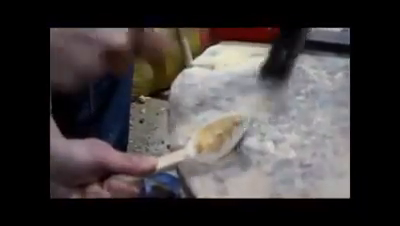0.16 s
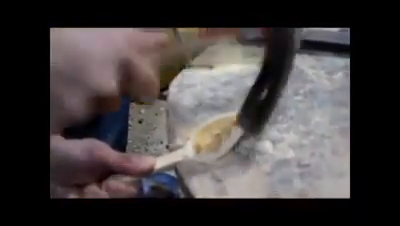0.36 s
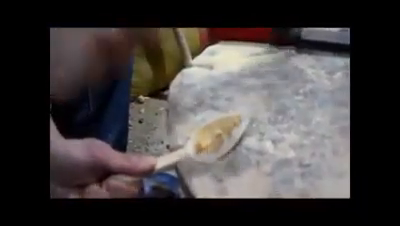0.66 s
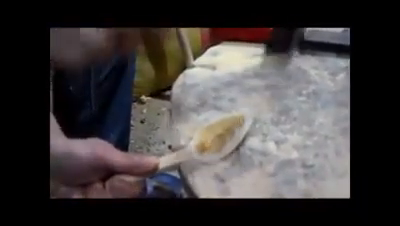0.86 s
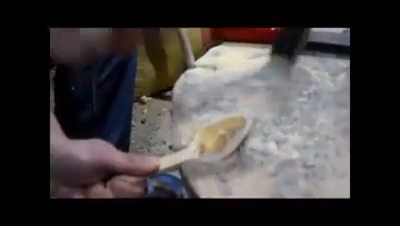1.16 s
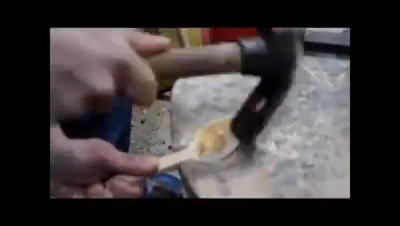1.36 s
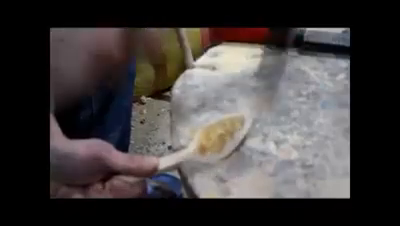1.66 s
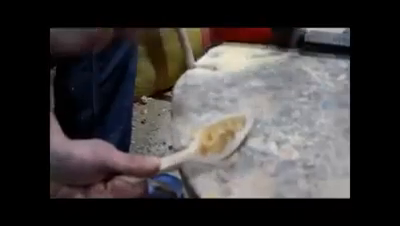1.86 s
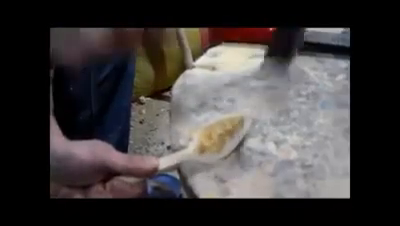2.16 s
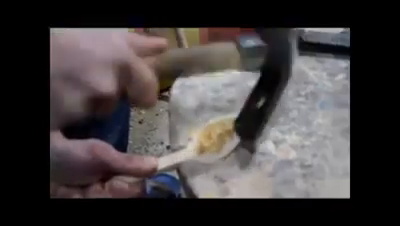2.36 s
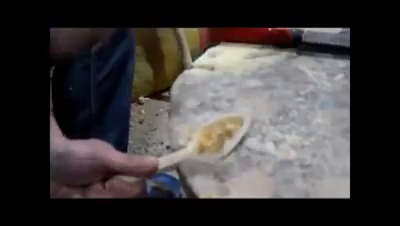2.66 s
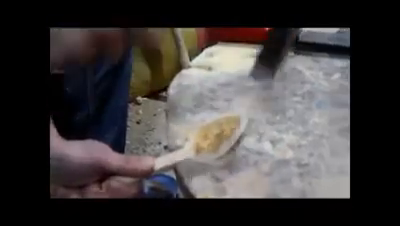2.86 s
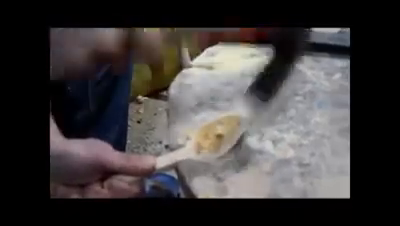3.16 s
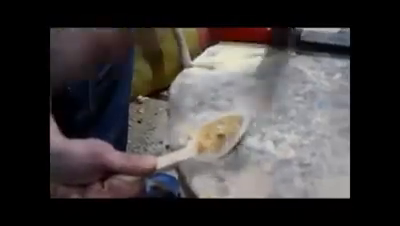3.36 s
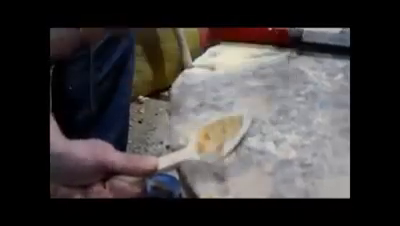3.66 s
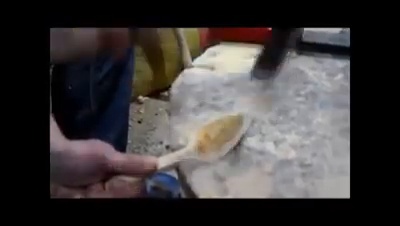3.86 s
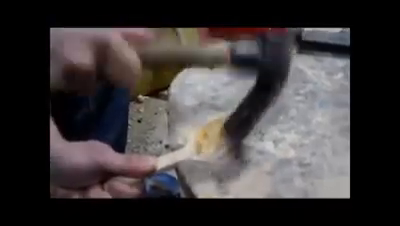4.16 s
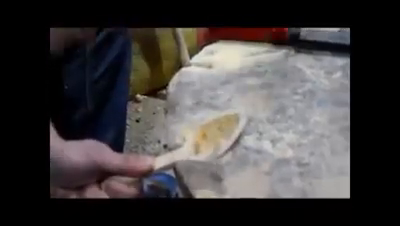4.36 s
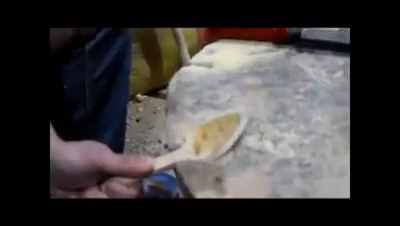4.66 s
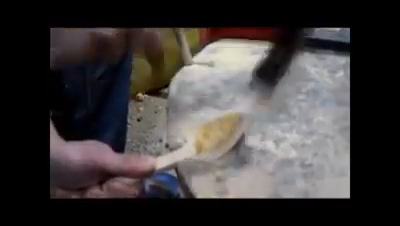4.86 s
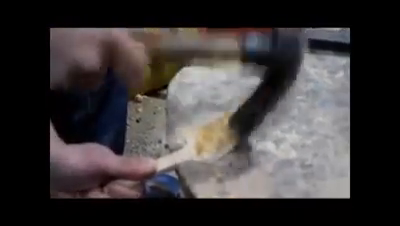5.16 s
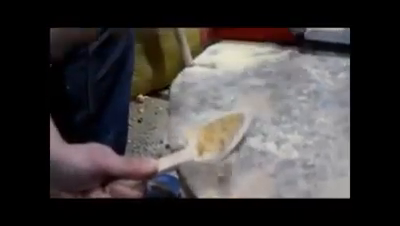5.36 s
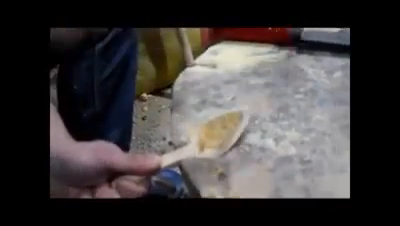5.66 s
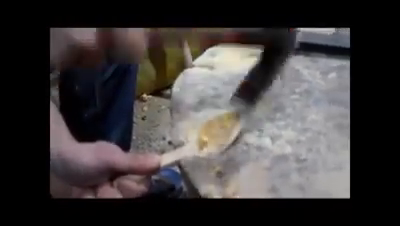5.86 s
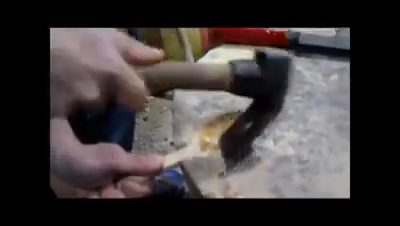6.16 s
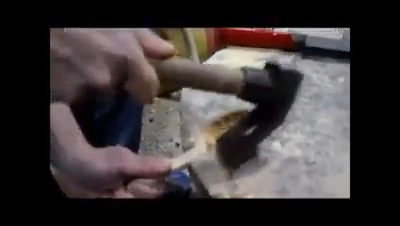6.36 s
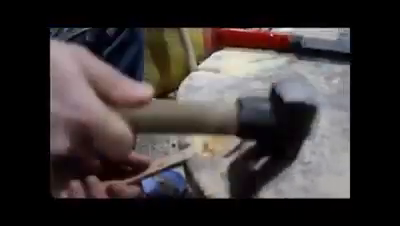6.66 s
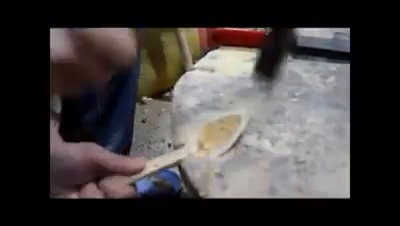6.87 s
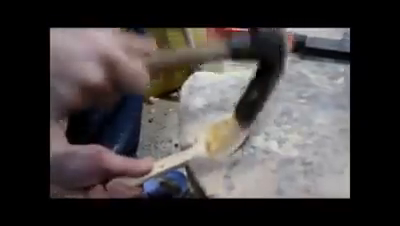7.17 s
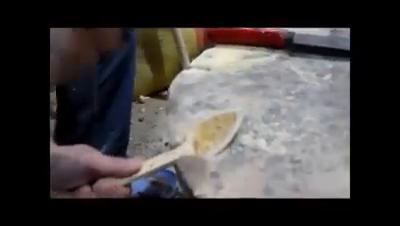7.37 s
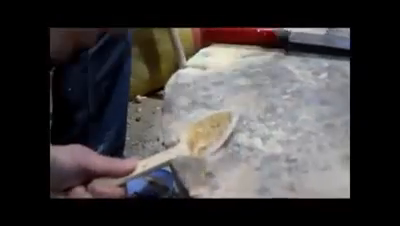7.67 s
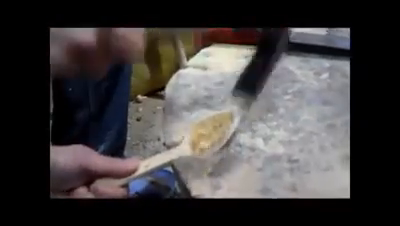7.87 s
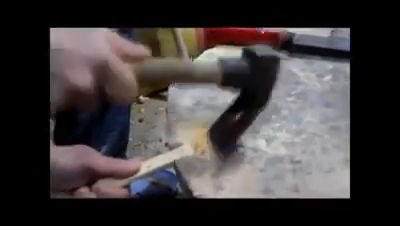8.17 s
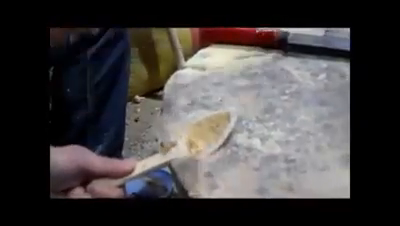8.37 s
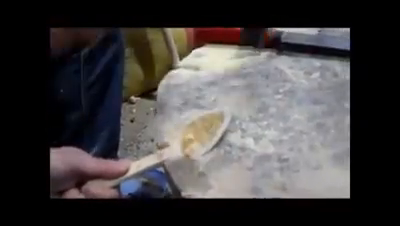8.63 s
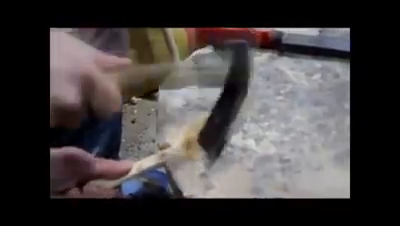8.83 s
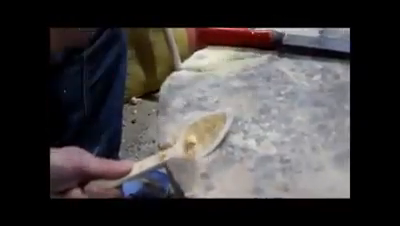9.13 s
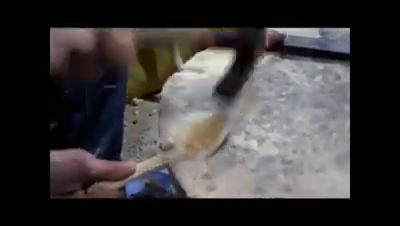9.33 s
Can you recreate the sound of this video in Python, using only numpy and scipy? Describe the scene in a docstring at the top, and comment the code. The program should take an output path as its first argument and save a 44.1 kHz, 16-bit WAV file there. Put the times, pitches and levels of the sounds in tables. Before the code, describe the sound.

Sharp, close wood chops with a dull knock underneath repeat evenly, stop briefly for two light knocks, then resume as small chips tick down.

```python
"""In a small workshop, a hand adze hollows a wooden spoon that lies on a heavy chopping block.
Each impact cracks the fibres in a burst of noise and excites the modes of spoon, steel and block;
the room reverberates and the close microphone overloads. Chips tick down and shavings rustle
over a steady background noise, and in a short pause the work is knocked lightly twice."""
import sys
import numpy as np
from scipy import signal
from scipy.fft import rfft, irfft
from scipy.io import wavfile

SR = 44100
rng = np.random.default_rng(int(sys.argv[2]) if len(sys.argv) > 2 else 0)


def pcm_store(signal):
    """Save signal as 16-bit PCM."""
    levels = np.round(np.clip(np.atleast_2d(signal), -1, 1) * 32767)
    wavfile.write(sys.argv[1], SR, levels.astype(np.int16).T)


N = 418950
AGE = np.arange(int(.8 * SR)) / SR   # seconds since an event began


def from_db(db):
    """Amplitude ratio of a level in decibels."""
    return 10 ** (np.asarray(db) / 20)


def unit_energy(x):
    """Energy normalisation: the squares sum to one."""
    return x / np.sqrt(np.sum(x ** 2) + 1e-20)


def at_hz(points, hz, column=1):
    """Interpolation of a table column along log frequency."""
    table = np.array(points)
    return np.interp(np.log(np.maximum(hz, 1)), np.log(table[:, 0]), table[:, column])


def nearness(hz, centre_hz, octaves):
    """Gaussian weighting in log frequency, one at the centre."""
    return np.exp(-(np.log2(hz / centre_hz) / octaves) ** 2)


def decay(t60_s):
    """Exponential damping: 60 dB down after t60_s."""
    return np.exp(-np.log(1000) * AGE / t60_s)


def onset(rise_s):
    """Finite rise time: a smooth climb from zero to one."""
    return 1 - np.exp(-(AGE / rise_s) ** 2)


def noise(spectrum):
    """Spectral shaping of white noise by rows of (frequency_hz, density_db); rms 1."""
    gain = from_db(at_hz(spectrum, np.arange(N // 2 + 1) * SR / N))
    return unit_energy(irfft(rfft(rng.standard_normal(N)) * gain, N)) * np.sqrt(N)


def resonance(x, hz, octaves):
    """A single resonator passes a band around its pitch."""
    edges = np.clip([hz / 2 ** (octaves / 2), hz * 2 ** (octaves / 2)], 10, .47 * SR)
    return signal.sosfilt(signal.butter(1, edges, "band", fs=SR, output="sos"), x + 1e-18)


def ring(modes, drive_db, scatter_db, detune):
    """Modal superposition: the point of contact varies each damped sine's sign, strength and pitch."""
    hz, level_db, t60_s = np.transpose(modes)
    polarity, strength, mistuning = rng.standard_normal((3, len(hz)))
    gains = np.sign(polarity) * from_db(level_db + drive_db + scatter_db * strength)
    pitches = hz * (1 + detune * mistuning)
    return sum(g * np.sin(2 * np.pi * f * AGE) * decay(t) for g, f, t in zip(gains, pitches, t60_s))


def add(track, start_s, sound):
    """Linear superposition of a sound from start_s on."""
    start = int(round(start_s * SR))
    part = sound[max(-start, 0):N - start]
    track[max(start, 0):max(start, 0) + len(part)] += part


def background():
    """Stationary noise of the workshop, strongest in the low hundreds of hertz."""
    # noise spectrum: frequency_hz, density_db
    spectrum = [(18, -59), (30, -22.5), (161, -4), (204, -9), (233, -4.5), (303, -8.5), (355, -4),
                (394, -11), (486, -6.5), (540, -10.5), (988, -13), (1250, -14.5), (4300, -26.5),
                (16000, -51.5)]
    return from_db(-43.5) * noise(spectrum)


def tick(hz, t60_s):
    """Impact on a sliver of wood: a damped noise burst through one resonance; peak 1."""
    size = SR // 10
    burst = rng.standard_normal(size) * (decay(t60_s) * onset(0.00061))[:size]
    click = resonance(burst, hz, octaves=0.47)
    return np.pad(click / np.max(np.abs(click)), (0, len(AGE) - size))


def tearing(cut_s, treble_db, top_db):
    """Fracture noise: fibres part within milliseconds, brighter when the wood splits cleanly."""
    # spectrum of splitting fibres: frequency_hz, density_db
    colour = [(200, -11.5), (800, -2.5), (1200, -6.5), (1700, 3), (3000, 1), (5000, -7), (7500, -14),
              (9000, -20.5), (16000, -27)]
    size = 2048
    cut = np.exp(-(AGE / cut_s) ** 2)
    rough_tail = from_db(-21.0) * decay(0.046)
    envelope = (onset(0.00022) * (cut + rough_tail))[:size]
    raw = rfft(rng.standard_normal(size) * envelope)
    # so many fibres break that no single pitch stands out
    burst = irfft(raw / (np.abs(raw) + 1e-12)) * np.sqrt(envelope)
    hz = np.arange(len(AGE) // 2 + 1) * SR / len(AGE)
    spectrum = rfft(burst, len(AGE)) * from_db(at_hz(colour, hz))
    strength = np.linalg.norm(irfft(spectrum))
    brightness_db = at_hz([(2800, 0.0055), (4800, treble_db), (7500, treble_db), (9500, top_db)], hz)
    crack = irfft(spectrum * from_db(brightness_db)) / strength
    crack[size:] = 0
    return crack


def spoon(spot_hz):
    """Selective excitation: the spoon's modes ring most strongly near the struck spot's pitch."""
    # spoon under the blade: pitch_hz, level_db, t60_s
    modes = [(734, -12.5, 0.0098), (924, -3.5, 0.0068), (1528, -15, 0.02), (1633, -7.5, 0.0077),
             (2016, -6, 0.0091), (2259, -11, 0.014), (2837, -6, 0.0076), (3813, 8.5, 0.0027),
             (4090, 12.5, 0.0016)]
    drive_db = 12.5 * nearness(np.array(modes)[:, 0], spot_hz, octaves=0.12)
    return unit_energy(ring(modes, drive_db, scatter_db=2.5, detune=0.012) * onset(0.00067))


def shove():
    """Heavily damped resonance: the dull push of the adze head against the block."""
    pulse = decay(0.0051) * onset(0.00027)
    return unit_energy(resonance(pulse, hz=388, octaves=1.1))


def steel(spot_hz):
    """Free vibration of the adze head: faint, but stronger when one particular spot is struck."""
    # steel head: pitch_hz, level_db, t60_s
    modes = [(7000, -39, 0.16), (7260, -31.5, 0.11)]
    drive_db = -8.5 + 14.5 * nearness(spot_hz, centre_hz=1643, octaves=.08)
    return ring(modes, drive_db, scatter_db=2.0, detune=0.0017)


def block(push_db, hollow_db):
    """Transmission through the spoon into the block: low modes thud, higher ones knock, a few ring hollow."""
    # chopping block and its stand: pitch_hz, level_db, t60_s
    modes = [(87, -38.5, 0.34), (126, -37.5, 0.57), (148.8, -32, 0.53), (163.6, -24.5, 0.22),
             (183, -37, 0.2), (222, -26, 0.098), (229.4, -23.5, 0.15), (277, -36.5, 0.61),
             (309.7, -29, 0.25), (339, -32, 0.48), (411.6, -29, 0.42), (442, -30, 0.47),
             (471.4, -27.5, 0.3), (524, -22, 0.14), (569, -37.5, 0.6), (584, -30, 0.31), (681, -16.5, 0.1),
             (700, -29, 0.3), (814, -45, 0.45), (843, -30.5, 0.2), (990, -46, 0.39), (1057, -37.5, 0.39)]
    hz = np.array(modes)[:, 0]
    # the knock grows faster with the push than the thud does
    drive_db = at_hz([(280, 0.96 * push_db), (560, 1.01 * push_db)], hz)
    drive_db += nearness(hz, centre_hz=464, octaves=0.25) * (hollow_db - drive_db)
    return ring(modes, drive_db, scatter_db=2.0, detune=0.003) * onset(0.0036)


def workshop():
    """Room impulse response: early reflections and a diffuse tail that dies sooner in the treble."""
    # reverberation: frequency_hz, density_db, t60_s
    reverb = [(50, -5, 1), (141, 4.5, 0.37), (394, 5, 0.43), (745, -1, 0.42), (1330, -4, 0.52),
              (1940, -6.5, 0.44), (3270, -13, 0.44), (6700, -9.5, 0.43), (8900, -7, 0.21),
              (16000, -16.5, 0.3)]
    # first returns from floor, bench and walls: delay_s, level_db
    reflections = [(.0105, -24), (.0148, -28), (.0178, -21), (.047, -25.5)]
    edges = np.geomspace(35, 17000, 19)
    white = rng.standard_normal((2, len(AGE)))
    far_wall_swell = 1 + from_db(-16.0) * np.exp(-((AGE - 0.031) / 0.032) ** 2)
    response = np.zeros(len(AGE))
    for k, (low, high) in enumerate(zip(edges, edges[1:])):
        hz = np.sqrt(low * high)
        band = signal.sosfilt(signal.butter(2, [low, high], "band", fs=SR, output="sos"), white[k % 2])
        envelope = decay(at_hz(reverb, hz, column=2)) * onset(0.002) * far_wall_swell
        gain = from_db(at_hz(reverb, hz)) * np.sqrt((high - low) * 2 / SR)
        response += gain * unit_energy(band * envelope)
    for delay_s, level_db in reflections:
        add(response, delay_s, from_db(level_db) * np.array([1, 2, 1]) / 4)
    return response


def adze(room):
    """Impulsive excitation: each blow drives fibres, spoon, steel and block at once."""
    # blows, about three a second: start_s, force_db, spot_hz, treble_db, push_db, hollow_db
    blows = [(-0.125, -4, 2010, -2, 3, 4), (0.206, -4.5, 1980, -7, -5, -0.5),
             (0.5296, -5, 1680, -6.5, -3.5, 5.5), (0.8532, -2.5, 1790, -1, 3, 1.5),
             (1.1813, -3.5, 1630, -4, 3, 0.5), (1.5087, 0, 2860, 2, -12, -1),
             (1.8414, -0.5, 1630, 2.5, -0.5, 3), (2.179, 1, 1630, 3, 3, -3),
             (2.5232, 3.5, 2010, 1, 6.5, 1.5), (2.8685, 3.5, 2360, 7.5, 0.5, 6.5),
             (3.216, 4.5, 2180, 5.5, 6.5, -1), (3.5628, 2, 1543, -2, -3, 1.5), (3.9139, 7, 1780, 3, 8, 4.5),
             (4.254, -5, 1920, -1.5, -8.5, -4.5), (4.5916, -0.5, 2054, 2, -6.5, -11),
             (4.9252, 3.5, 3070, 2.5, 7, 6.5), (5.2515, 2, 2840, 6, 5, 0), (5.5869, 4, 3490, 8, 6.5, -0.5),
             (5.9204, -2, 2710, 1.5, -1, 2.5), (6.2507, 3.5, 2800, 7, 1.5, 4),
             (7.27, -10.5, 1820, -9, -4, -3), (7.5979, -6.5, 3500, -1, -1.5, -7),
             (7.9311, 0.5, 2123, 0.5, -5, -0.5), (8.2794, -4, 1694, -4.5, -8, 5),
             (8.6432, -6.5, 1820, -4, -7, -3), (9.0073, -4.5, 1840, -1, -8, 3),
             (9.3666, -2, 2710, 0.5, 5, 6.5)]
    bowl_share = .36   # the spoon's bowl faces the microphone and sends less into the room
    out = np.zeros(N)
    for start_s, force_db, spot_hz, treble_db, push_db, hollow_db in blows:
        cut_s = 0.004 * 2 ** (-force_db / 8.5)   # a harder blow cuts through sooner
        top_db = 2.5 + 0.63 * force_db   # the crisp top grows more slowly than the force
        crack = from_db(force_db + 16.0) * tearing(cut_s, treble_db - force_db, top_db - force_db)
        bowl = from_db(force_db + 17.5) * spoon(spot_hz)
        push = from_db(push_db - 4.0) * shove()
        echo = signal.fftconvolve(crack + bowl_share * bowl + push, room)[:len(AGE)]
        ping = steel(spot_hz)
        boom = from_db(0.5) * block(push_db, hollow_db)
        add(out, start_s, crack + bowl + push + echo + ping + boom)
        # the edge grazes loose chips just before it bites
        add(out, start_s - .0025, from_db(force_db - 25.0) * tick(hz=5500, t60_s=0.066))
    return out


def chips(crumb_count):
    """Small impacts: chips tick at set times, fainter crumbs at random ones."""
    # chips that break off or land close by: start_s, level_db, pitch_hz
    falls = [(0.518, -19, 6100), (3.696, -27, 4620), (4.844, -30.5, 1390), (5.149, -38, 4800),
             (5.780, -26, 1350), (6.463, -35, 4720), (6.477, -30, 3650), (7.21, -25.5, 2360),
             (7.46, -39, 3200), (7.825, -32.5, 3530), (8.317, -22, 4500)]
    crumbs = [((when + 1) / 2 * N / SR, -46.5 + 0.5 * size, 5200 * 2 ** (.6 * pitch))
              for when, size, pitch in rng.uniform(-1, 1, (crumb_count, 3))]
    out = np.zeros(N)
    for start_s, level_db, pitch_hz in list(falls) + crumbs:
        add(out, start_s, from_db(level_db) * tick(pitch_hz, t60_s=0.021))
    return out


def shavings():
    """Friction noise of wood sliding on wood: each high rustle swells and dies away."""
    # shavings on the block and the spoon turning in the hand: peak_s, level_db, rise_s
    rustles = [(1.695, -41, 0.026), (3.34, -57, .008), (5.362, -55, .008), (6.405, -50, .05),
               (6.72, -57, 0.048)]
    t60_s = 0.3
    envelope = np.zeros(N)
    for peak_s, level_db, rise_s in rustles:
        rise = np.minimum(AGE / rise_s, 1)
        fall = from_db(-60 * np.maximum(AGE - rise_s, 0) / t60_s)
        add(envelope, peak_s - rise_s, from_db(level_db) * rise * fall)
    return envelope * noise([(1500, -20), (5000, -5), (8500, 0), (11000, -9), (16000, -18)])


def knocks():
    """Damped modes with a contact click: the spoon is knocked lightly as it is turned."""
    # light knocks: start_s, level_db, click_db
    taps = [(6.415, -12, -12.5), (6.75, -15, -7)]
    # loosely held spoon and haft: pitch_hz, level_db, t60_s
    modes = [(246, -6, 0.03), (402, -4.5, 0.048), (458, -7, 0.074), (527, -8.5, 0.057), (656, -0.5, 0.025)]
    out = np.zeros(N)
    for start_s, level_db, click_db in taps:
        body = ring(modes, drive_db=0, scatter_db=1.0, detune=0.04) * onset(0.0009)
        click = from_db(click_db) * tick(hz=2860, t60_s=0.052)
        add(out, start_s, from_db(level_db) * (body + click))
    return out


def limiter(x, threshold_db, slope, attack_s, release_db_per_s):
    """Dynamic compression: too slow for the crack, it ducks what follows and soon recovers."""
    power = signal.lfilter(np.ones(64) / 64, 1, x[0] ** 2)
    level_db = 10 * np.log10(np.abs(power) + 1e-12)
    reduction_db = slope * np.maximum(level_db - threshold_db, 0)
    recovery_db = release_db_per_s * np.arange(N) / SR
    held_db = np.maximum.accumulate(reduction_db + recovery_db) - recovery_db
    pole = np.exp(-1 / (attack_s * SR))
    return x * from_db(-signal.lfilter([1 - pole], [1, -pole], held_db))


def scene():
    """Superposition in one channel; convolution with the room adds reverberation to the impacts."""
    room = workshop()
    steady = background()
    carving = adze(room)
    small_impacts = knocks() + chips(crumb_count=7)
    small_echo = from_db(-8.5) * signal.fftconvolve(small_impacts, room)[:N]
    return (steady + carving + small_impacts + small_echo + shavings())[None]


def record(dry):
    """Compression, then saturation that flattens each blow's first milliseconds, then band limiting."""
    ceiling, low_hz, high_hz = 0.51, 45, 15900
    ducked = limiter(dry, threshold_db=-7.5, slope=0.43, attack_s=0.0025, release_db_per_s=92.0)
    clipped = ducked / (1 + (ducked / ceiling) ** 6) ** (1 / 6)
    thinned = signal.sosfilt(signal.butter(1, low_hz, "high", fs=SR, output="sos"), clipped)
    return signal.sosfilt(signal.ellip(10, .1, 80, high_hz, fs=SR, output="sos"), thinned)


dry = scene()
out = record(dry)
pcm_store(out)
```